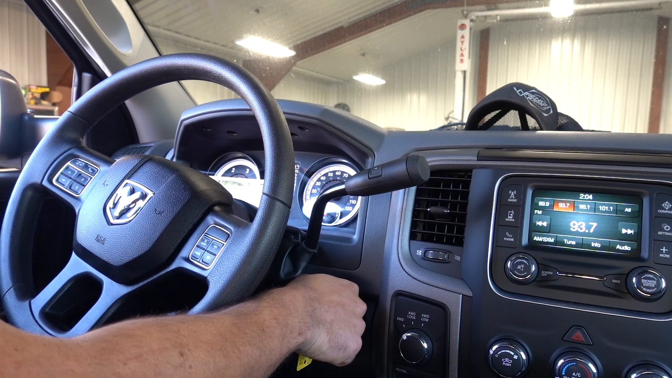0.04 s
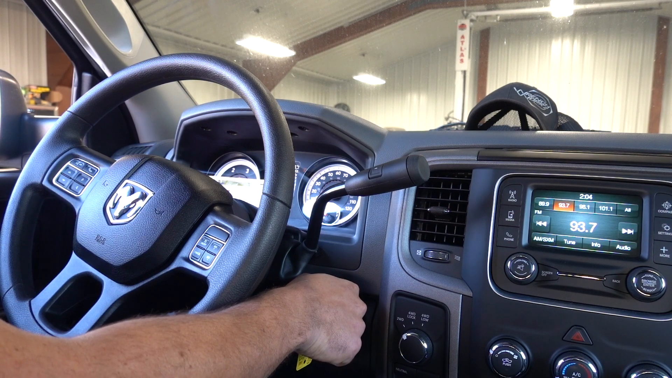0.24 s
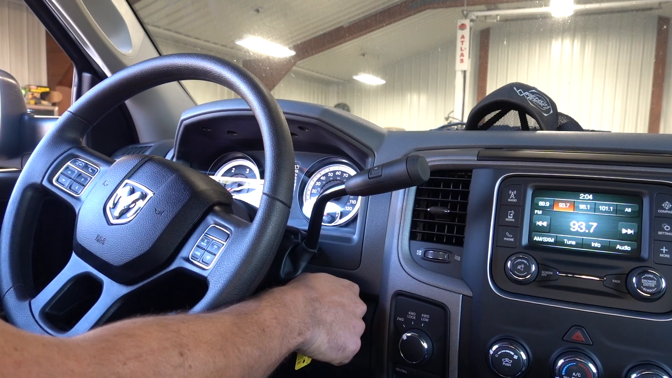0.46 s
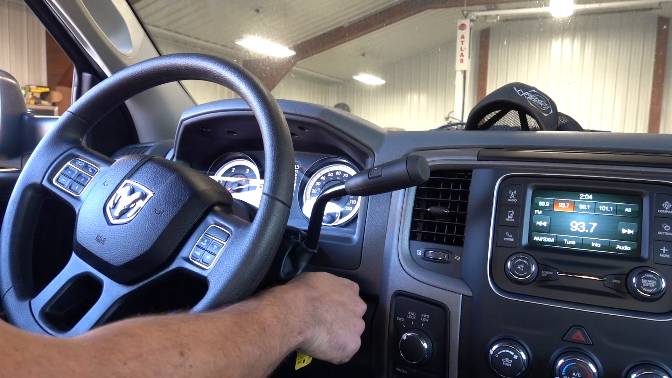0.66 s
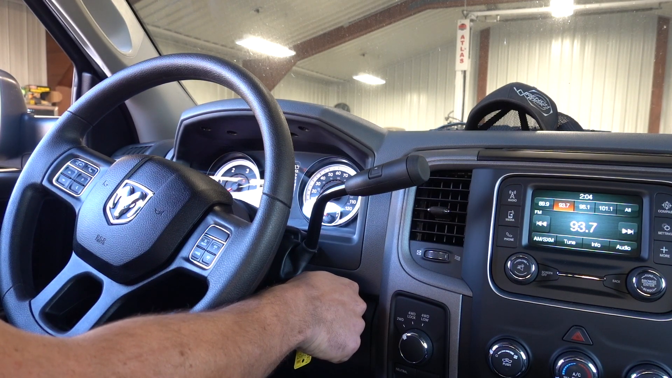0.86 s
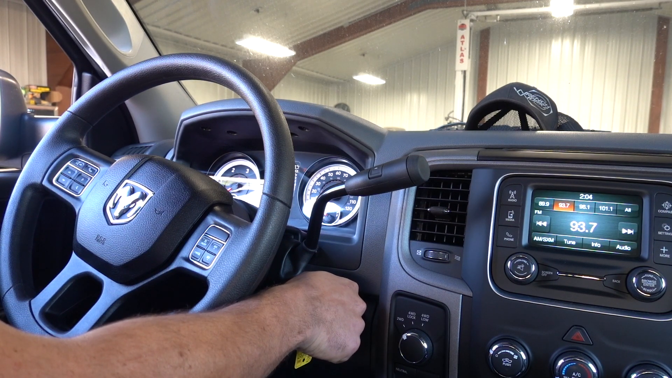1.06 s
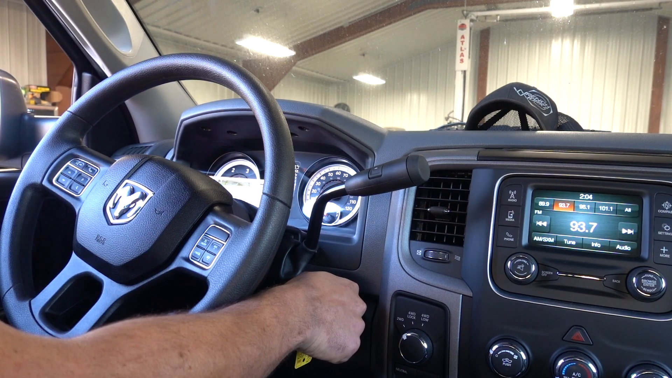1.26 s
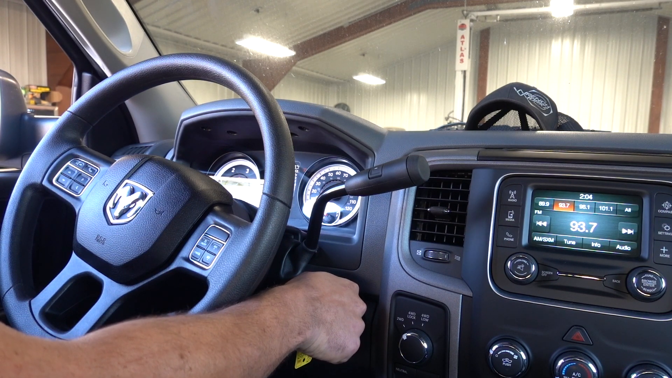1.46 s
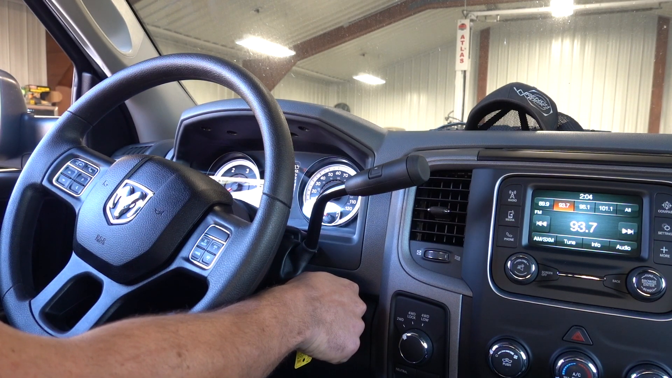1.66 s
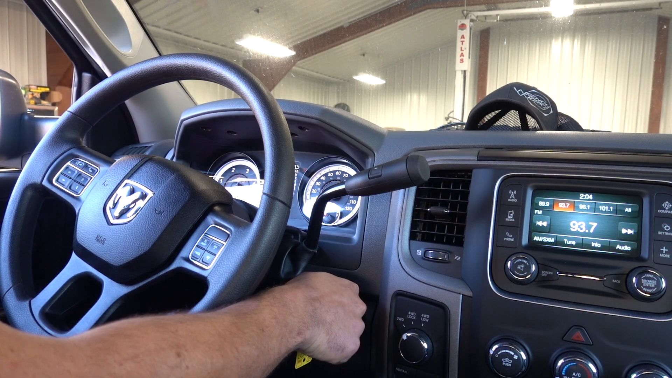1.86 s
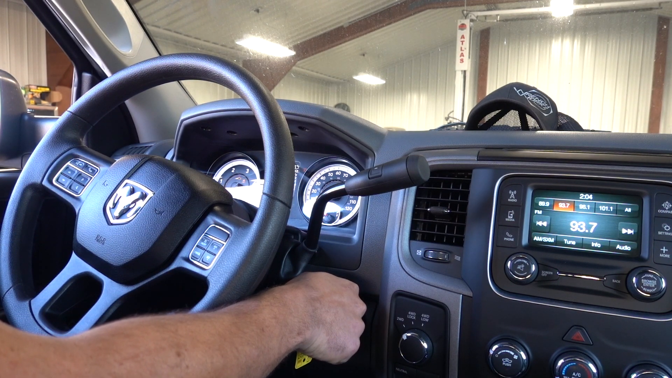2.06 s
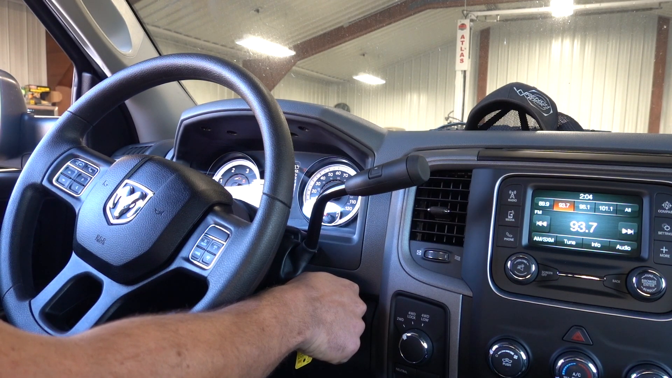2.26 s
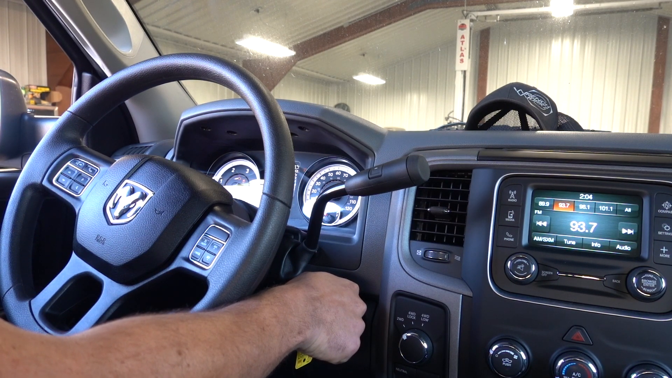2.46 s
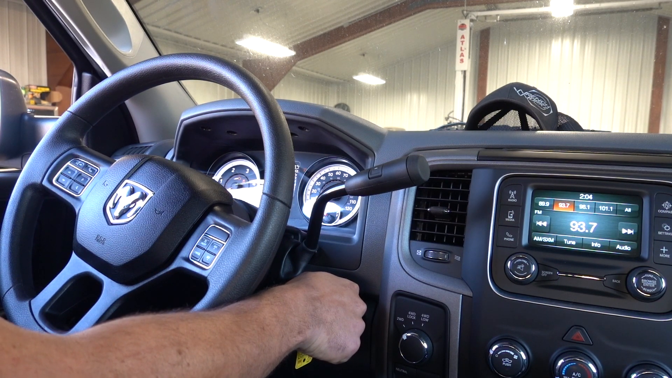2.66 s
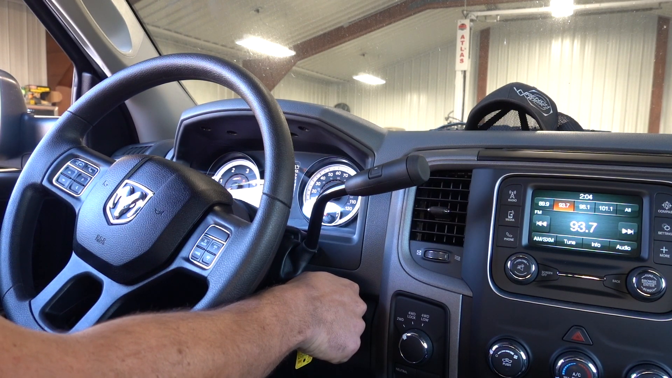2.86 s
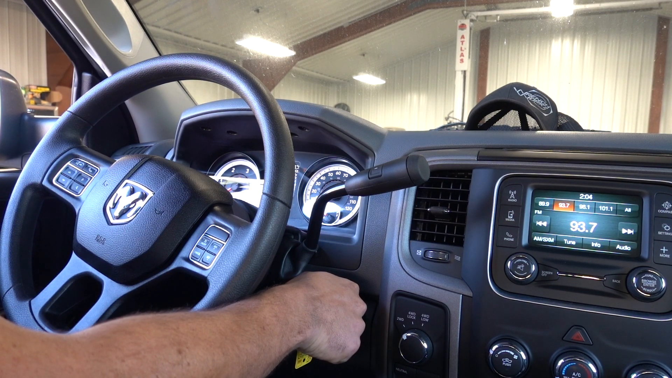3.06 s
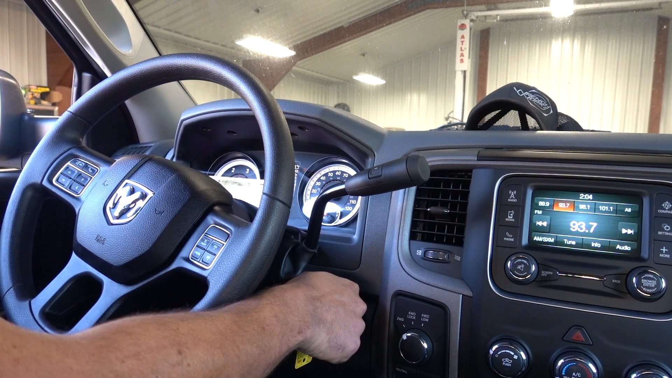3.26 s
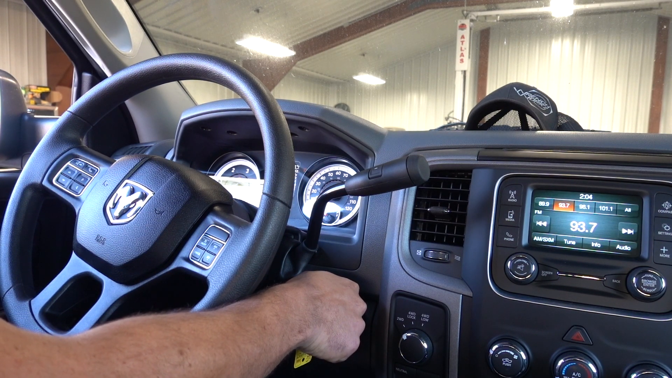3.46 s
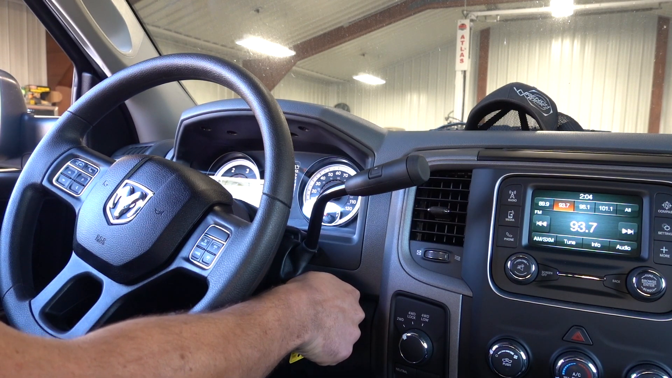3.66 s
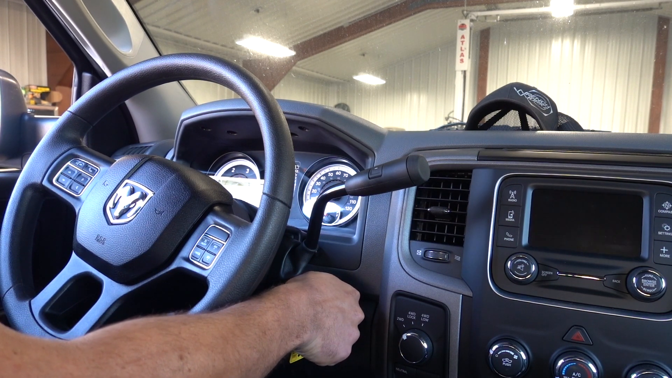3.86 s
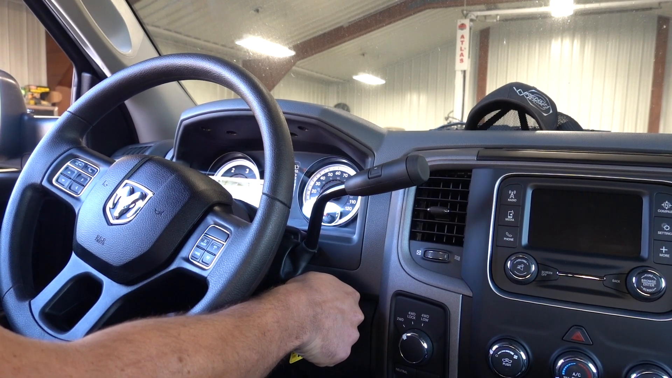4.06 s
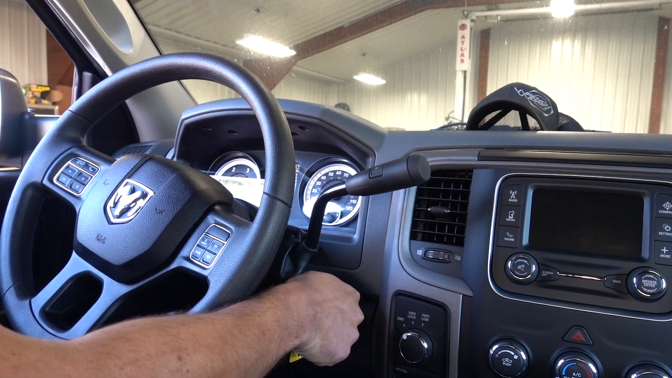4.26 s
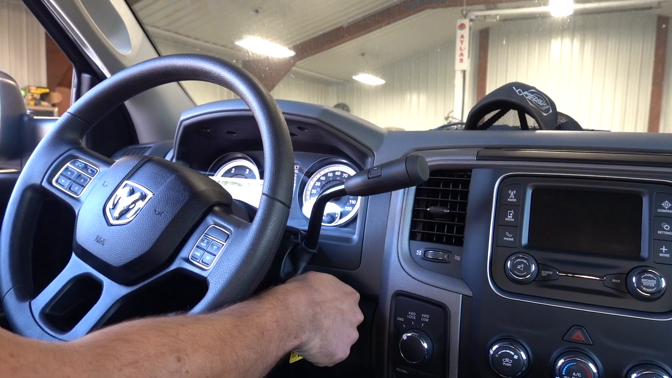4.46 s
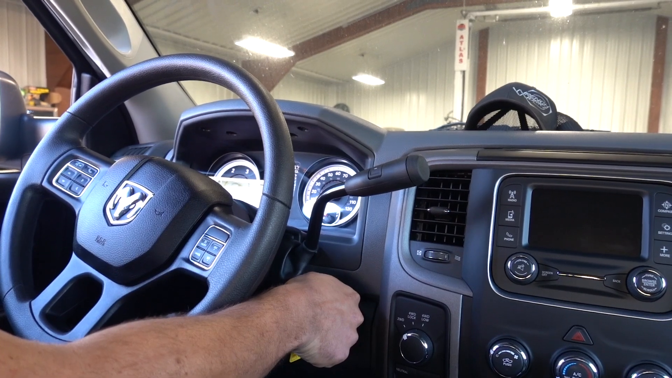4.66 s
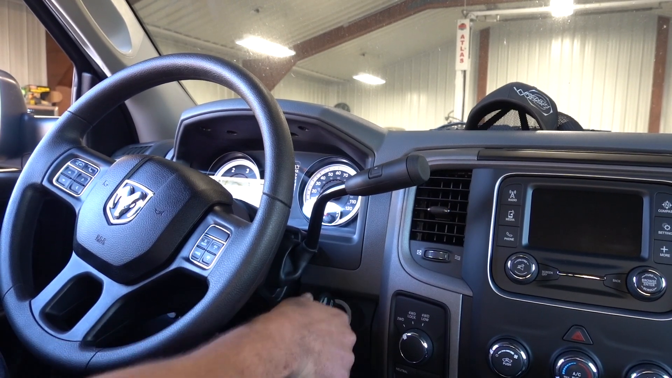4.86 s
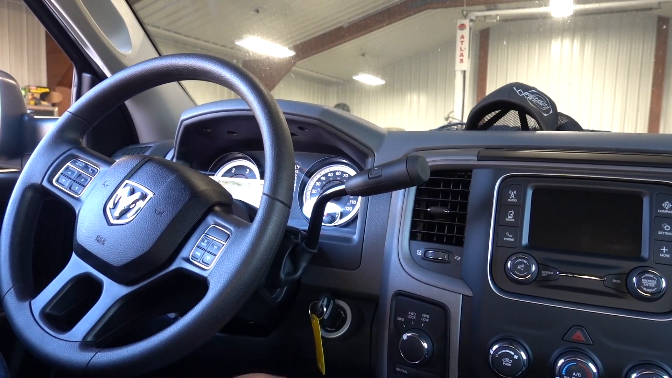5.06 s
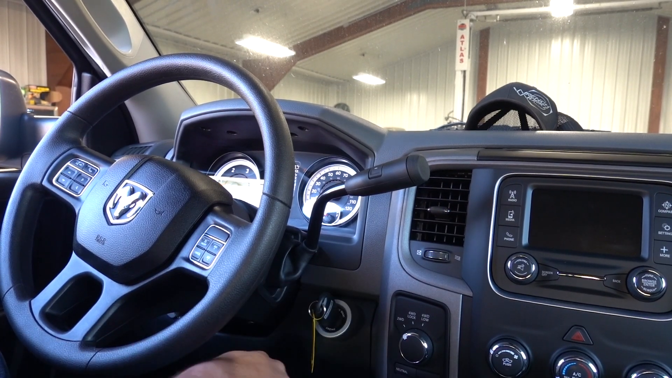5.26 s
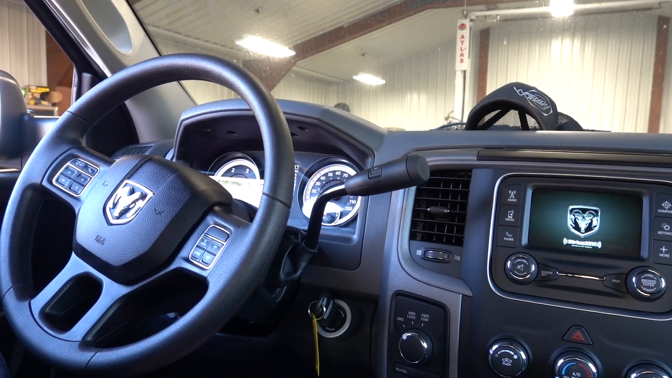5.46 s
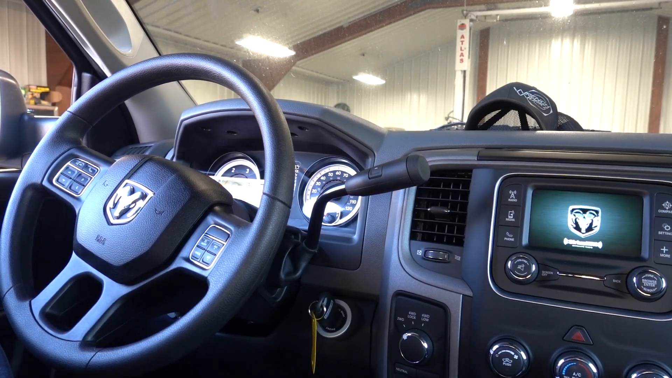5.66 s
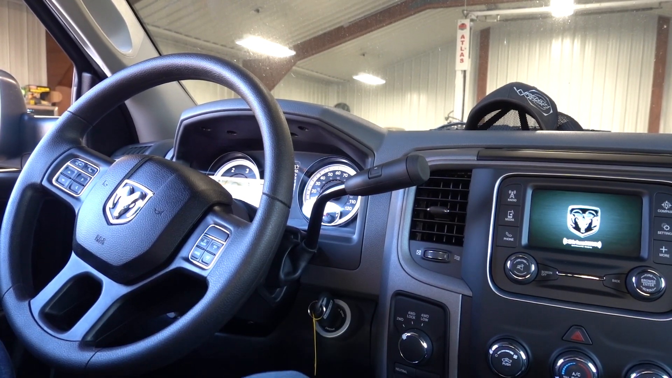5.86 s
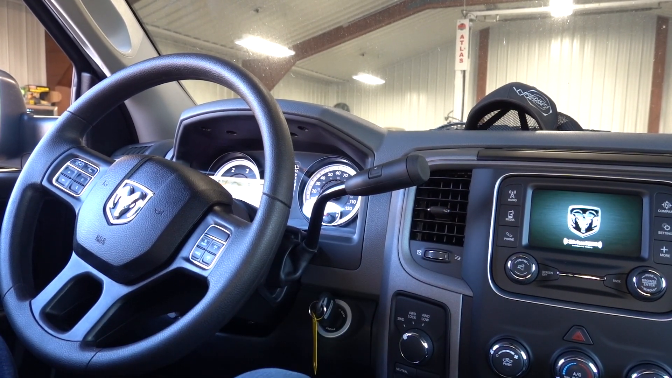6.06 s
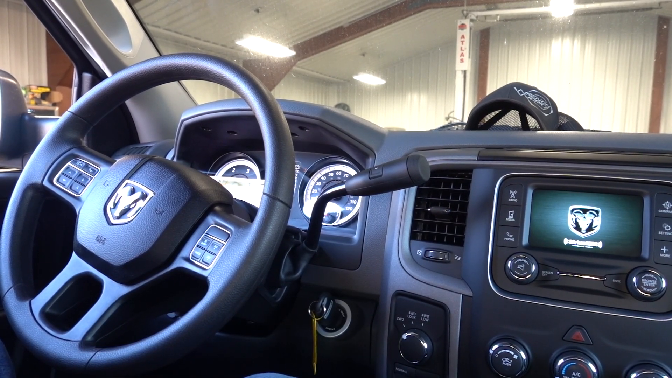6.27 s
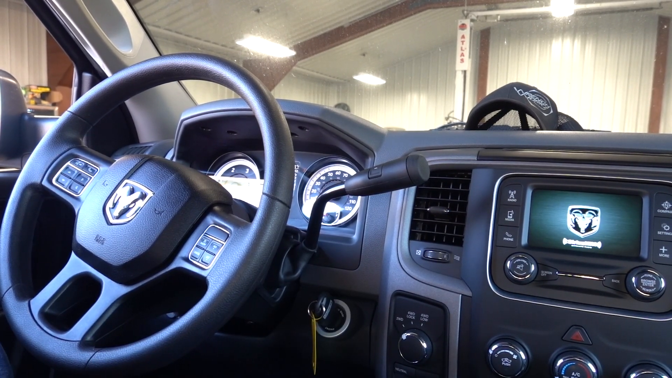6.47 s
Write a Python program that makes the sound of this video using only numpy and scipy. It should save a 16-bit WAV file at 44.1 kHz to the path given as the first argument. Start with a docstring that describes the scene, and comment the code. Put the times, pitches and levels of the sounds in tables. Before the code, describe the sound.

Heard from the driver's seat of a diesel pickup in a workshop, with low rumble, slowly growing fan air and a barely audible high whistle. At 0.15-0.3 s a key scrapes round and gives heavy thuds and a bright tick; small clicks follow until 1 s. A soft rush of fuel swells around 1 s and fades, while a pump hums near 100 Hz until about 2.3 s, then more faintly from 2.75 to 3.3 s. Very faint thin tones flicker. At 3.5-3.9 s the key clicks and scrapes again, and the starter bites with a squeal, grinding and whining in pulses through several compressions. From 4.55 s the engine catches: squeals, hollow bangs and a deep boom by 4.7 s. A sharp metallic key snap comes at 4.84 s. The flare dies away into a loud, throbbing fast idle, sinking slightly in pitch, with growl, injector clatter and light intake hiss until an abrupt end around 6.6 s.

```python
"""Diesel pickup start-up

Heard from the driver's seat in a workshop, over low rumble, fan air and a thin electronic whistle.
The key scrapes and clicks (struck resonances, noise bursts); fuel rushes in and the pump hums.
The starter grinds and squeals (tooth strikes, gliding tones) through a few compressions.
The engine catches with a boom, flares briefly and settles into a throbbing fast idle
(lines and blows locked to the crankshaft, coloured as exhaust, block, injectors and intake)."""
import sys
import numpy as np
from scipy import signal
from scipy.fft import rfft, irfft, next_fast_len
from scipy.io import wavfile
from scipy.ndimage import uniform_filter1d

SR = 44100
rng = np.random.default_rng(int(sys.argv[2]) if len(sys.argv) > 2 else 0)


def transcribe(signal):
    """Save signal, clipped to [-1, 1], as a 16-bit WAV file at the path in sys.argv[1]."""
    frames = np.atleast_2d(signal).T
    limited = np.clip(frames, -1, 1)
    pcm = np.round(limited * 32767).astype(np.int16)
    wavfile.write(sys.argv[1], SR, pcm)


N = 287532
T = np.arange(N) / SR


def undb(db):
    """Decibels to gain."""
    return 10 ** (np.asarray(db) / 20)


def unit(x):
    """Scale to rms 1."""
    return x / np.sqrt(np.mean(x ** 2) + 1e-20)


def steady(x):
    """Level the signal to a running rms near 1."""
    power = uniform_filter1d(uniform_filter1d(x ** 2, size=3000), size=3000)
    return x / np.sqrt(np.abs(power) + 1e-4 * np.mean(x ** 2))


def noise():
    """Two unrelated white noises: what arrives straight on, and what arrives from the sides."""
    return rng.standard_normal((2, N))


def walk(rate):
    """Smoothed random drift with a spread near 1, drawing a new value `rate` times a second."""
    k = max(int(SR / rate), 1)
    steps = np.repeat(rng.standard_normal(N // k + 1), k)
    return 1.3 * uniform_filter1d(uniform_filter1d(steps, k), k)[:N]


def response(points):
    """Causal (minimum-phase) impulse response of a (f/Hz, level/dB) colour."""
    size = 8192
    hz, db = np.transpose(points)
    f = np.maximum(np.fft.rfftfreq(size, 1 / SR), 1)
    octaves_beyond = np.maximum(np.log2(hz[0] / f), 0) + np.maximum(np.log2(f / hz[-1]), 0)
    gain = undb(np.interp(np.log(f), np.log(hz), db) - 24 * octaves_beyond)
    # folding the cepstrum forward in time makes the response causal
    cepstrum = irfft(np.log(gain + 1e-5), size)
    cepstrum[1:size // 2] *= 2
    cepstrum[size // 2 + 1:] = 0
    return irfft(np.exp(rfft(cepstrum)), size)


def colour(x, points):
    """Filter with the given (f/Hz, level/dB) response."""
    return signal.oaconvolve(np.atleast_2d(x), response(points)[None], axes=1)[:, :N]


def ring(x, modes):
    """Parallel resonances (f/Hz, width/Hz, level/dB)."""
    return sum(undb(db) * signal.lfilter(*signal.iirpeak(hz, hz / abs(width), fs=SR), x)
               for hz, width, db in modes)


def hits(at, levels_db):
    """One impulse at each time."""
    return np.bincount((at * SR).astype(int), undb(levels_db), N)


def blows(cycles, scatter_db):
    """One blow of uneven strength at each whole cycle."""
    at = np.flatnonzero(np.diff(np.floor(cycles)) > 0)
    out = np.zeros(N)
    out[at] = undb(scatter_db * rng.standard_normal(len(at)))
    return out


def fade(x, seconds):
    """Give every blow an exponential tail."""
    return signal.lfilter([1], [1, -np.exp(-1 / (seconds * SR))], x)


def cushion(x, seconds):
    """Soften each impulse into a short rounded push."""
    return fade(fade(x, seconds), seconds) / (seconds * SR) ** 2


def ramp(start, length):
    """Straight rise from 0 to 1."""
    return np.clip((T - start) / length, 0, 1)


def since(start):
    """Seconds gone by since a moment; 0 before it."""
    return np.maximum(T - start, 0)


def swell(start, rise, hold, fall):
    """Envelope from 0 to 1: straight attack, hold, exponential release."""
    return ramp(start, rise) * np.exp(-since(start + rise + hold) / fall)


def bump(at, half):
    """Bell-shaped envelope around its peak."""
    return np.exp(-((T - at) / half) ** 2)


def chirps(table, rough):
    """Short gliding tones that flutter into narrow bands of noise."""
    out = 0
    for at, half, hz, glide, flutter_hz, db in table:
        near = np.abs(T - at) < 3 * half
        phase = 2 * np.pi * np.cumsum((hz + glide * (T - at)) * near) / SR
        tone = (1 + rough * walk(flutter_hz)) * np.sin(phase) + rough * walk(flutter_hz) * np.cos(phase)
        out = out + undb(db) * bump(at, half) * tone / np.sqrt(1 + rough ** 2)
    return out


RUMBLE_DB, AIR_DB, AIR_RISE_DB_PER_S = -55.5, -60.5, .5
KEY_ON_S, SURGE_DB, SURGE_FALL_S = 0.24, -45, 0.031


def background():
    """Workshop rumble that swells briefly at key-on, slowly growing fan air, a thin electronic whistle."""
    rumble = unit(colour(noise(), [
        (22, -4), (40, -5), (58, 4.0), (75, -7.0), (125, 1.0), (160, -9.0), (205, -3),
        (240, -12.0), (290, -10.5), (420, -23.5), (600, -36.5)]))
    air = unit(colour(noise() * undb(1.16 * walk(6.94)), [
        (400, -10.0), (620, -6), (800, 5.5), (1100, 1.5), (1400, 2.0), (2000, -2),
        (2800, -13.5), (4500, -19.5), (9000, -21.5), (15000, -21.5)]))
    surge = undb(SURGE_DB) * swell(KEY_ON_S, 0.033, 0.047, SURGE_FALL_S)
    whistle = undb(-72) * np.sin(2 * np.pi * 15627 * T)
    return rumble * (undb(RUMBLE_DB) + surge) + air * undb(AIR_DB + AIR_RISE_DB_PER_S * T) + whistle


# clicks and knocks of the ignition lock, relays, starter pinion and keys:
# (t/s, thud level/dB, clack level/dB, tick level/dB, metal ring level/dB)
CLICKS = [(0.2177, -26, -55, -72, -75), (0.249, -32, -57, -62, -70), (0.281, -31, -39, -29.5, -42),
          (0.485, -61, -55, -60, -56), (0.752, -65, -62, -63, -59), (0.795, -53, -51, -53, -39.5),
          (0.861, -52, -59, -56.5, -70), (1.002, -41, -61, -58.5, -65), (3.52, -63, -53, -74, -56),
          (3.611, -45, -55, -63, -60), (3.706, -44, -44, -65, -69), (3.776, -30, -36, -56, -64),
          (3.918, -32, -28.5, -44, -50), (4.838, -34, -26.5, -19, -22.5), (4.893, -47, -49, -43, -40)]
# the key sliding round in the lock, pressed harder until it trips: (start t/s, length t/s, level/dB)
KEY_TURNS = [(0.15, 0.13, -58), (3.565, 0.14, -62.5)]
# rings of the steering column: (f/Hz, width/Hz, level/dB)
COLUMN = [(109, 20, 7), (137, 34, 5), (175, 27, -2), (239, 26, -10), (310, 13, -25), (425, 17, -20)]
# rings of the metal lock and keys: (f/Hz, width/Hz, level/dB)
LOCK = [(3040, 100, 9), (4050, 220, -2), (6150, 180, -20), (8900, 300, -19)]
# rings of the lock barrel under the sliding key: (f/Hz, width/Hz, level/dB)
BARREL = [(1440, 60, 0), (2420, 70, -2), (3650, 120, -5), (4680, 90, -10), (5370, 150, -10)]
# rings of the detent spring, heard in every tick: (f/Hz, width/Hz, level/dB)
DETENT = [(1238, 40, 1), (2500, 42, 11), (2915, 55, 13), (4220, 50, 2), (6100, 50, -3), (8770, 55, 6),
          (9070, 60, -6)]
PUSH_S = 0.00052  # the hand cushions each thud
KEY_EASE_S = 0.014
TAIL_DB, TAIL_T60_S = -35, 1.2  # the clicks die away in the workshop; level against the tick


def ignition():
    """Each click thuds in the steering column, clacks in its plastic shroud and ticks in the metal lock."""
    at, thud_db, clack_db, tick_db, ring_db = np.transpose(CLICKS)

    def burst(levels_db, t60, points):
        """Dying rattle of the given colour."""
        rattle = noise() * fade(hits(at, levels_db), t60 / np.log(1000))
        return colour(rattle, points) / np.linalg.norm(response(points))

    push = cushion(hits(at, thud_db), PUSH_S)
    thud_body = burst(thud_db - 9.5, 0.097, [
        (80, -10.0), (120, 6.5), (200, -0.5), (400, -4.5), (600, -33.0)])
    thud = undb(37) * ring(push, COLUMN) + thud_body
    clack = burst(clack_db, 0.14, [
        (450, 3.0), (800, 7.0), (1500, -1.5), (2600, -14.0), (3500, -14.5)])
    metal = [(2000, 4.0), (2800, 4.0), (4500, 3.0), (6500, 0.5), (9000, 0.5), (15000, -15)]
    snap = burst(tick_db, 0.069, metal)
    jingle = ring(burst(ring_db, 0.028, metal), LOCK)
    tick = 0.5 * (snap + ring(snap, DETENT)) + 1.2 * jingle
    tail = burst(tick_db + TAIL_DB, TAIL_T60_S, [
        (400, 6), (1500, 2), (3500, 9), (7000, 0), (14000, -10)])
    sliding = sum(undb(db) * np.sqrt(swell(start, length, 0, KEY_EASE_S))
                  for start, length, db in KEY_TURNS)
    scrape = unit(colour(noise() * undb(2 * walk(180)), [
        (500, -25), (1500, 8), (3300, 6.0), (5800, -5.0), (7500, -9), (14000, -8)]))
    scrape = unit(scrape + 0.71 * unit(ring(noise(), BARREL)))
    return thud + clack + tick + tail + sliding * scrape


RUSH_S, RUSH_HOLD_S, RUSH_FALL_S, RUSH_DB = 0.87, 0.27, 0.47, -63.5


def fuel_rush():
    """Fuel rushes into the empty line as a swelling and fading band of noise."""
    rush = unit(colour(noise(), [(350, -9.0), (580, -1), (800, -1), (1200, -8)]))
    return undb(RUSH_DB) * rush * swell(RUSH_S, 0.098, RUSH_HOLD_S, RUSH_FALL_S)


# runs of the fuel pump: (start t/s, hold t/s, f/Hz, level/dB)
PUMP_RUNS = [(0.983, 1.22, 99.7, -53), (2.75, 0.41, 96.3, -57)]
PUMP_RISE_S, PUMP_FALL_S, PUMP_SAG_HZ_PER_S = 0.24, 0.17, 2.36


def pump():
    """The fuel pump hums in two runs, sinking in pitch as it builds pressure."""
    out = 0
    for start, hold, hz, db in PUMP_RUNS:
        pitch = (hz - PUMP_SAG_HZ_PER_S * since(start)) * (1 + 0.0089 * walk(12.08))
        phase = 2 * np.pi * np.cumsum(pitch) / SR
        hum = np.sin(phase) + undb(-8) * np.sin(2.1 * phase)
        level = undb(db + 1.2 * walk(6.0))
        out = out + hum * level * swell(start, PUMP_RISE_S, hold, PUMP_FALL_S)
    return out


# very faint thin wavering tones near 3.5 kHz:
# (peak t/s, half length t/s, f/Hz, glide Hz/s, flutter f/Hz, level/dB)
THIN_TONES = [(1.64, 0.11, 3620, -300, 149, -78), (1.83, 0.13, 3470, -400, 149, -76),
              (2.43, .12, 3600, -2, 150, -83), (3.33, 0.093, 3560, -300, 150, -85)]


def thin_tones():
    """Thin tones flicker faintly after the rush, each a fluttering sine under a bell-shaped envelope."""
    return chirps(THIN_TONES, rough=.8)


# compressions while cranking: (t/s, rocking of the engine level/dB, whine of the loaded gears level/dB)
COMPRESSIONS = [(3.935, -38.5, -55), (4.08, -62, -29), (4.254, -36, -33.5), (4.41, -37, -34),
                (4.57, -32.5, -59)]


def stroke(lead):
    """Swing between 1, lead seconds before each compression, and -1 midway between them."""
    at = np.transpose(COMPRESSIONS)[0]
    return np.cos(2 * np.pi * np.interp(T + lead, at, np.arange(len(at))))


SWING, SWING_LEAD_S = .04, .03
OVERRUN, OVERRUN_S, OVERRUN_RISE_S = .16, 4.46, 0.082  # climb as the engine catches


def starter_speed():
    """Relative speed of the starter: it swings once per compression and climbs as the engine catches."""
    return 1 + SWING * stroke(SWING_LEAD_S) + OVERRUN * ramp(OVERRUN_S, OVERRUN_RISE_S)


# colour of the engine rocking on its mounts: (f/Hz, level/dB)
ROCK_COLOUR = [(22, 0), (46, 4), (65, -7.5), (115, -4), (152, -18), (211, -11), (258, -15.5), (327, -8),
               (420, -14), (520, -30)]
# colour of the starter's gears: (f/Hz, level/dB)
GEAR_COLOUR = [(450, -8), (650, -17.5), (810, -3), (880, -5), (1050, 3), (1420, -2), (1850, -0.5),
               (2300, -4.5), (3160, -9), (3600, -5), (4020, -26), (4700, -19), (8700, -26.5), (12000, -25),
               (15800, -37)]
# rings of the starter and bell housing: (f/Hz, width/Hz, level/dB)
HOUSING = [(830, 6.7, 6.5), (1060, 32, -23), (1580, 14, -12), (1825, 73, -8), (2430, 210, -7),
           (2703, 50, 1), (2913, 40, 2), (3110, 87, 2.5), (3830, 210, -1.5)]
# whine of the starter's gears: (multiple of the whine pitch, level/dB)
WHINE = [(1, 1), (1.1, -8), (1.402, -20), (1.72, -13), (1.999, -11.5), (2.3, -9), (2.65, -11), (3, -8.5),
         (3.749, -24)]
# rings of the engine bouncing on its mounts: (f/Hz, width/Hz, level/dB)
MOUNTS = [(46.3, 14, -4), (114, 23, -9.5)]
# it engages, pulls until the engine takes over, and fades away
STARTER_ON_S, STARTER_RISE_S, STARTER_HOLD_S, STARTER_FALL_S = 3.908, 0.027, 0.79, 0.19
KEY_RELEASE_S = 4.86
GRIND_DB, GRIND_LOAD_DB, WHINE_DB, ROCK_DB = -30, 1.5, -42.5, -34
BOUNCE_DB, ROCK_SWING_DB = 64, 1
WHINE_HZ, MESH_HZ = 1068, 325  # both scaled by the relative speed
STROKE_RISE_S, STROKE_HOLD_S, STROKE_FALL_S = 0.012, 0.026, 0.052
WHINE_DELAY_S = 0.014  # the loaded gears whine a little after each compression


def starter():
    """Pinion teeth strike the ring gear and ring the housing; each compression loads the gears."""
    speed = starter_speed()
    at, rock_db, whine_db = np.transpose(COMPRESSIONS)
    loads = np.array([swell(s, STROKE_RISE_S, STROKE_HOLD_S, STROKE_FALL_S) for s in at])
    teeth = np.cumsum(MESH_HZ * speed) / SR
    strikes = blows(teeth + 0.046 * walk(300), 2.0)
    # the reduction gears chatter about once in three teeth
    chatter = 6.1 + fade(blows(teeth / 3 + 0.1 * walk(67), 6.2), 0.079)
    # the same worn spots come round every three teeth: a dense comb of lines that glides with the speed
    worn_spot = (teeth / 3 % 1 * 420).astype(int)
    wear = rng.standard_normal((2, 420))[:, worn_spot]
    scrape = unit(noise() * (0.8 + fade(strikes, 0.0018)))
    grind = chatter * (scrape + .5 * unit(strikes) + .65 * wear)
    # the housing screeches louder as the pinion speeds up; whine and screech fade once it runs free
    pulling = swell(STARTER_ON_S, STARTER_RISE_S, STARTER_HOLD_S, fall=1.0)
    screech_db = -6 + 20 * (speed - 1)
    screech = steady(ring(ring(grind, HOUSING), [(1760, 4000, 0)]))
    gears = steady(colour(grind, GEAR_COLOUR)) + pulling * undb(screech_db) * screech
    gears = gears * undb(GRIND_DB + GRIND_LOAD_DB * loads.sum(0))
    phase = 2 * np.pi * np.cumsum(WHINE_HZ * speed * (1 + 0.00928 * walk(150))) / SR
    # worn teeth make every line of the whine flutter
    whine = sum(undb(db) * (1 + .45 * walk(70)) * np.sin(k * phase + .65 * walk(60)) for k, db in WHINE)
    mesh = undb(-8.5 + 2 * walk(15)) * np.sin(2 * np.pi * teeth)
    strain = sum(undb(db) * swell(s + WHINE_DELAY_S, 0.013, 0.018, 0.035) for s, db in zip(at, whine_db))
    tones = pulling * (whine + mesh) * (undb(WHINE_DB) + strain)
    # the heavy block needs a moment before it sways; at first only the lighter parts shake
    sway = ramp(STARTER_ON_S + 0.046, 0.046)
    light = steady(colour(noise(), [(85, -1.0), (210, 2.0), (330, 0.5), (480, -12.5)]))
    shake = sway * steady(colour(noise(), ROCK_COLOUR)) + (1 - sway) * light
    bounce = undb(BOUNCE_DB) * ring(hits(at, rock_db), MOUNTS)
    shake_level = undb(ROCK_DB + ROCK_SWING_DB * stroke(-0.018)) + undb(rock_db) @ loads
    rocking = bounce + shake * shake_level
    engaged = swell(STARTER_ON_S, STARTER_RISE_S, STARTER_HOLD_S, STARTER_FALL_S)
    engaged = engaged * (1 - ramp(KEY_RELEASE_S, 0.35))
    return engaged * (gears + tones + rocking)


# squeals of the pinion against the ring gear:
# (peak t/s, half length t/s, f/Hz, glide Hz/s, flutter f/Hz, level/dB)
SQUEALS = [(3.945, .04, 1897, -1300, 330, -29.5), (4.02, .05, 823, -100, 20, -34),
           (4.075, .06, 1805, -800, 120, -32), (4.27, .035, 3890, -300, 196, -36.5),
           (4.47, .025, 3220, -1500, 215, -29), (4.505, .03, 3910, 1500, 400, -32),
           (4.525, .018, 1187, 1501, 80, -29.5), (4.543, .018, 1540, 0, 60, -30),
           (4.598, .026, 2995, 1500, 600, -25), (4.65, 0.026, 3080, 1503, 600, -25),
           (4.76, .02, 3960, -1000, 160, -32)]


def squeal():
    """The pinion's teeth squeal as they first meet the ring gear, and again as the engine overruns them."""
    return ramp(STARTER_ON_S, 0.011) * chirps(SQUEALS, rough=1.1)


# the engine catches on a shot of extra fuel: when, how long it builds, is held and dies away
CATCH_S, FUEL_RISE_S, FUEL_HOLD_S, FUEL_FALL_S = 4.55, 0.14, 0.1, 0.11
CRANKING_HZ, IDLE_HZ, FLARE_HZ = 4.5, 19.058, 2.021  # turns per second; the flare adds to the idle
RUN_UP_S, FLARE_HOLD_S, SETTLE_S, SAG_HZ_PER_S = .13, .0986, .2957, .58


def crank_speed():
    """Turns per second: a quick run-up, a flare that dies away, a slowly sinking idle."""
    after = since(CATCH_S + RUN_UP_S + FLARE_HOLD_S)
    running = IDLE_HZ + FLARE_HZ * np.exp(-after / SETTLE_S) - SAG_HZ_PER_S * after
    return CRANKING_HZ + (running - CRANKING_HZ) * np.sin(np.pi / 2 * ramp(CATCH_S, RUN_UP_S))


def orders(turns, table, waver, lag):
    """Lines locked to the crankshaft; each wavers, and higher ones arrive later through the body."""
    lines = 0
    for k, db in table:
        phase = 2 * np.pi * k * turns - lag * k * k + waver * walk(11.0)
        lines = lines + undb(db) * (1 + waver * walk(9.9)) * np.sin(phase)
    return unit(lines)


# steady exhaust drone: (multiple of the crank speed, level/dB)
DRONE = [(2, -5.5), (3, -21), (4, 3.5), (5, -2.5), (5.37, -4.5), (6, -8.5), (6.35, -21), (7, -1), (8, -11)]
# steady block growl: (multiple of the crank speed, level/dB)
GROWL = [(9, 0.5), (10, -7), (11, -5.5), (12, 0.5), (13, -15), (13.75, -2.5), (14, -14), (15, -3.5),
         (16, -1), (17, -4), (18, -12.5), (19, -1.5), (20, -11), (21, -16), (22, -4.5), (23, -8)]
# colours of exhaust puffs, block, injector clatter and intake hiss: (f/Hz, level/dB)
BOOM = [(20, -18.5), (33, 4), (50, -2.5), (65, -4.5), (90, -10), (120, 3.5), (150, -13.5), (220, -27.5)]
BLOCK = [(110, -24.5), (165, -2), (200, -1), (260, -1.5), (295, -4), (335, -6), (410, -3.5), (490, -23),
         (700, -29)]
CLATTER = [(400, -13.5), (490, 0.5), (760, -4), (822, 0.5), (920, -3.5), (1160, -1.5), (1540, -10.5),
           (1680, -8), (1820, -7.5), (2400, -9.5), (3200, -15), (3860, -15), (4800, -26.5), (7000, -35.5)]
HISS = [(3000, -3.5), (4500, -1.5), (5700, -8.5), (7500, -9), (10000, -13), (13400, -17.5), (15800, -31)]
# cabin panels that sing as the growl sweeps through them: (f/Hz, width/Hz, level/dB)
PANELS = [(200.3, 6.3, 5.5), (220, 9.9, -8.5), (257.2, 9.4, 1), (331.5, 13.2, 4.5)]
# strength of the four firings of each turn, two of them weaker, so the idle throbs: level/dB
FIRING_DB = [0.5, -5.5, -9, 2]
# gulps of intake air: (peak t/s, half length t/s, level/dB)
GULPS = [(4.664, 0.07, -30), (5.616, 0.16, -48.5), (6.036, 0.065, -51.5)]
# the first hard firings of the flare:
# (t/s, exhaust thump level/dB, extra knock level/dB, hollow bang level/dB)
HARD_FIRINGS = [(4.636, -25, -2, -42), (4.667, -19.5, 2, -29.5), (4.693, -17, 0, -37),
                (4.719, -17.5, -1, -40), (4.74, -22.5, -1, -40), (4.762, -23.5, 1, -31)]
KNOCK_RISE_S, KNOCK_HOLD_S, KNOCK_FALL_S = 0.0069, 0.007, 0.0075
START_TURNS = .815
# each part of the running engine: its base level, and what the extra fuel adds
DRONE_DB, DRONE_FUEL_DB, DRONE_RISE_S = -18.4, 11.4, .19
PUFF_DB, PUFF_FUEL_DB = -25.5, 8.5
GROWL_DB, GROWL_FUEL_DB, GROWL_DB_PER_HZ = -28, 2, 1
BLOCK_DB, BLOCK_FUEL_DB = -1, 6  # the block's knock against the growl lines
CLATTER_DB, CLATTER_FUEL_DB = -34, -2
# the hiss eases as the flare dies away and the idle settles
HISS_DB, HISS_FUEL_DB, HISS_EASE_DB_PER_S = -48, 1.5, 3.5
# the drone is strongest below this crank speed and weakens above it, down to a limit
BOOM_SPEED_HZ, OFF_BOOM_DB_PER_HZ, OFF_BOOM_DB = 18.59, 5.5, 12
BOOM_RISE_S, GROWL_DELAY_S, GROWL_RISE_S = 0.094, 0.053, 0.039


def engine():
    """Firings boom in the exhaust, shake the block and rattle the injectors; the intake hisses."""
    speed = crank_speed()
    turns = START_TURNS + np.cumsum(speed) / SR
    fuel = swell(CATCH_S, FUEL_RISE_S, FUEL_HOLD_S, FUEL_FALL_S)
    firings = 4 * turns
    lines = orders(turns, DRONE, waver=.1, lag=.18)
    # the cabin booms below about 135 Hz, so the top of the drone only comes in as the speed falls
    drone = steady(colour(lines, [
        (20, -5.5), (36, 2.5), (46, 1.0), (73, -1), (92, 0), (129, 6.5), (138, -1.0),
        (147, -0.5), (165, -15.5), (220, -20.5)]))
    off_boom_db = np.clip(OFF_BOOM_DB_PER_HZ * (speed - BOOM_SPEED_HZ), 0, OFF_BOOM_DB)
    drone = drone * undb(DRONE_DB + DRONE_FUEL_DB * fuel - off_boom_db) * ramp(CATCH_S, DRONE_RISE_S) ** 2
    # strong and weak exhaust puffs alternate
    puffs = blows(firings + .05 * walk(60), 2) * (1 + .55 * np.cos(np.pi * firings))
    boom = drone + steady(colour(puffs, BOOM)) * undb(PUFF_DB + PUFF_FUEL_DB * fuel)

    thumps = blows(firings, 1.5) * undb(FIRING_DB)[firings.astype(int) % 4]
    block = steady(colour(thumps + 0.092 * noise() * fade(thumps, 0.012), BLOCK))
    growl = orders(turns, GROWL, waver=.27, lag=.16)
    growl = growl + undb(BLOCK_DB + BLOCK_FUEL_DB * fuel) * block
    growl = steady(growl + ring(growl, PANELS))
    hard_db = sum(db * swell(at, KNOCK_RISE_S, KNOCK_HOLD_S, KNOCK_FALL_S)
                  for at, _, db, _ in HARD_FIRINGS)
    speed_db = GROWL_DB_PER_HZ * (speed - IDLE_HZ)
    growl = growl * undb(GROWL_DB + GROWL_FUEL_DB * fuel + speed_db + hard_db)

    # every firing sets off a burst of tiny metal impacts, stronger on one side of each turn
    knocks = fade(blows(firings + .15 * walk(70), 1.5), .008) * (1 + .13 * np.sin(2 * np.pi * turns))
    rattle = noise() * (1.1 + knocks)
    metal_ring = unit(ring(rattle, [(843, 7.6, 5.5), (1290, 155, -5.0), (1524, 3.5, 7.0)]))
    clatter = steady(unit(colour(rattle, CLATTER)) + undb(-7.5) * metal_ring)
    clatter = clatter * undb(CLATTER_DB + CLATTER_FUEL_DB * fuel + hard_db)

    ease_db = HISS_EASE_DB_PER_S * since(CATCH_S + RUN_UP_S)
    draught = undb(HISS_DB + HISS_FUEL_DB * fuel - ease_db)
    gulps = sum(undb(db) * bump(at, half) for at, half, db in GULPS)
    hiss = steady(colour(noise() * (1 + 0.13 * knocks), HISS)) * np.hypot(draught, gulps)
    # the injectors rattle at once; the boom builds as cylinders join in, the growl enters a little later
    return (ramp(CATCH_S, BOOM_RISE_S) * boom
            + ramp(CATCH_S + GROWL_DELAY_S, GROWL_RISE_S) * growl
            + ramp(CATCH_S, 0.012) * (clatter + hiss))


# colour of the hollow bang of each hard firing: (f/Hz, level/dB)
BANG = [(250, -3), (420, -2), (600, -1), (830, -2), (1050, -12)]
# rings of the exhaust that each hard firing thumps, a moment later: (f/Hz, width/Hz, level/dB)
EXHAUST = [(46, 26, -10), (106, 30, 0)]
THUMP_DELAY_S, THUMP_PUSH_S = .009, .0007


def first_firings():
    """Each hard firing thumps the exhaust and bangs hollowly in the block."""
    at, thump_db, _, _ = np.transpose(HARD_FIRINGS)
    pushes = cushion(hits(at + THUMP_DELAY_S, thump_db), THUMP_PUSH_S)
    bangs = sum(undb(db) * swell(s, KNOCK_RISE_S, KNOCK_HOLD_S, KNOCK_FALL_S)
                for s, _, _, db in HARD_FIRINGS)
    return bangs * unit(colour(noise(), BANG)) - undb(48) * ring(pushes, EXHAUST)


# stereo width of the cabin: (f/Hz, side against mid level/dB)
WIDTH = [(30, -34), (60, -57), (125, -26.5), (250, -16), (500, -10.5), (1000, -6), (2000, -6.5), (4000, -1),
         (8000, 3), (13000, -2), (18000, -4)]
# lean of the cabin to the left: (f/Hz, left minus right level/dB)
LEAN = [(30, .2), (70, 1.1), (125, 1.7), (250, 1), (500, .3), (1000, 3.2), (2000, 3.2), (4000, 1.1),
        (8000, -.3), (18000, -.7)]


def cabin(x, shared, lean, wide_db):
    """Sound from the sides reaches left and right out of step; mostly the treble does so."""
    margin = 8192
    size = next_fast_len(N + 2 * margin)
    padded = np.pad(x, ((0, 0), (margin, margin)), mode="reflect")
    front, around = rfft(padded, size, axis=1)
    share = np.clip(shared, 0, 1)
    log_hz = np.log(np.fft.rfftfreq(size, 1 / SR) + 1)
    width_db, lean_db = (np.interp(log_hz, np.log(hz), db)
                         for hz, db in (np.transpose(WIDTH), np.transpose(LEAN)))
    mix = (share * front + (1 - share) * around) / np.hypot(share, 1 - share)
    side = 1j * undb(width_db + wide_db) * mix  # a quarter cycle out of step
    ears = [irfft((front + s * side) * undb(s * lean * lean_db / 2), size) for s in (1, -1)]
    return np.array(ears)[:, margin:margin + N]


# how strongly each group leans to the left (share of the cabin's lean)
QUIET_LEAN, STARTER_LEAN, ENGINE_LEAN = 0.85, 0.8, 1


def scene():
    """Everything reaches the driver's seat through the cabin."""
    quiet = background() + ignition() + fuel_rush() + pump() + thin_tones()
    return (cabin(quiet, shared=0.16, lean=QUIET_LEAN, wide_db=1.0)
            + cabin(starter() + squeal(), shared=0.28, lean=STARTER_LEAN, wide_db=-0.5)
            + cabin(engine() + first_firings(), shared=0.57, lean=ENGINE_LEAN, wide_db=0.4))


TOP_HZ = 15800


def record(dry):
    """A steep low-pass cuts the top; the sound closes with a very short fade."""
    closing = np.minimum((T[-1] - T) / .004, 1)
    low_pass = signal.ellip(10, .2, 80, TOP_HZ, fs=SR, output="sos")
    return closing * signal.sosfilt(low_pass, dry)


dry = scene()
out = record(dry)
transcribe(out)
```